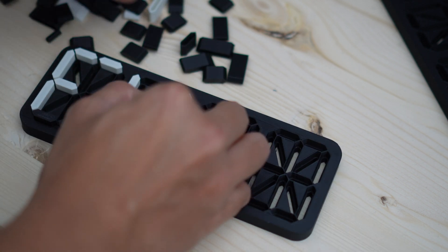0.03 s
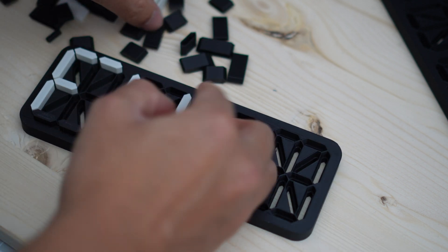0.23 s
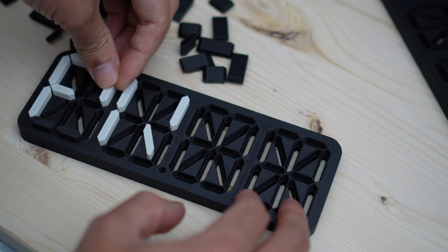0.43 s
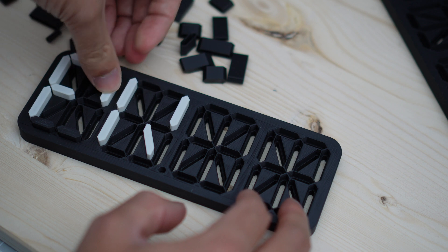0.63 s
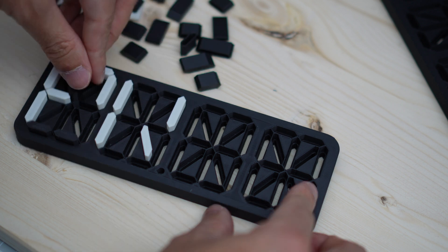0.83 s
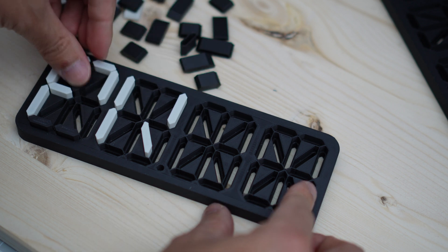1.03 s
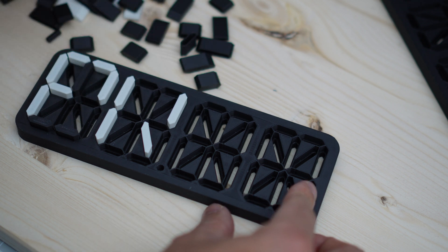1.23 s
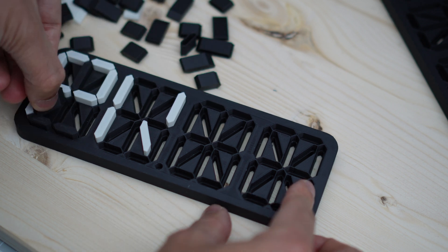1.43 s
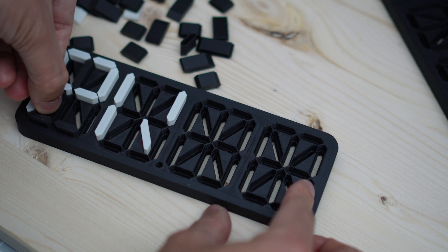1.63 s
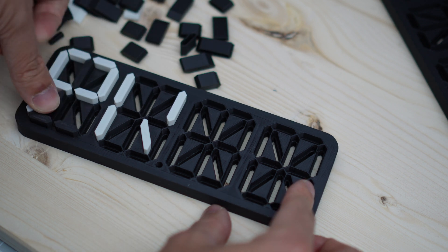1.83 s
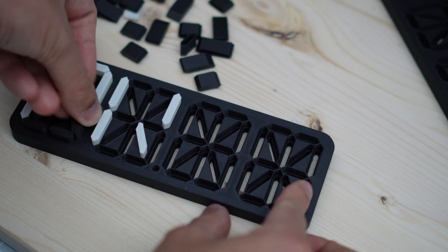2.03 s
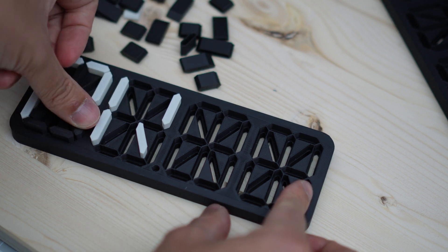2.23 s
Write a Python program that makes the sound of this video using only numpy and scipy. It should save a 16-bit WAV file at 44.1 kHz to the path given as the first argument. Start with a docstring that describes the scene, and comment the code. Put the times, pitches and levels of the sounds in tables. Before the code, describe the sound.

Small plastic pieces click sharply into a plastic panel on a wooden table; a loud snap opens, more follow around half a second, then a pause and lighter clicks. Close stereo microphone in a small quiet room.

```python
"""At a wooden table in a small room, fingers press small plastic pieces into a plastic panel, close by.
Pieces snap home, creak and scrape: noise bursts, sharp slips and rough noise ring plastic resonances.
Thuds shake the modes of the table top, decaying noise answers as the room, and faint air noise and
hiss lie beneath. At two instants all ringing already under way drops at once.
"""
import sys
import numpy as np
from scipy import signal
from scipy.fft import rfft, irfft, next_fast_len
from scipy.io import wavfile
from scipy.ndimage import uniform_filter1d

SR = 44100
rng = np.random.default_rng(int(sys.argv[2]) if len(sys.argv) > 2 else 0)


def store_pcm(level_fs):
    """Save levels as 16-bit WAV."""
    pcm = np.round(np.clip(level_fs, -1, 1) * 32767).astype(np.int16)
    wavfile.write(sys.argv[1], SR, np.atleast_2d(pcm).T)


def invert_db(x):
    """Field ratio 10**(x/20) for x, a level in decibels (scalar or array-like)."""
    u = np.asarray(x, float) / 20
    return 10 ** u


N = 100856
LEAD = 2205  # samples laid down before time zero, for sounds that begin early
CLICK_S = 0.0091  # time in which a click, or the shiver of a creak, falls 20 dB

RISE_SHARE, CRACKLE_DB = 0.15, -0.5  # rise as a share of CLICK_S; scatter of the crackle
CLICK_ROOM_DB = -6
# Pieces snapping home: start_s [s, middle of the rise], level_db [dB, strongest 3 ms, before a
# common 9 dB cut], pitch_hz [Hz, resonance of the piece], treble_db [dB, at 11 kHz and above]
CLICKS = [(-.012, 0.5, 2970, 5.5), (.2645, -27, 5600, 3), (0.2099, -46.5, 3100, -7),
          (0.2713, -17, 6080, -2), (0.3272, -26.5, 6000, -2.5), (.4498, -23, 5600, 8.5),
          (0.4554, -19, 4670, -9), (.536, -14.5, 4630, 16), (.5388, -5.5, 4930, 15),
          (0.7143, -31.5, 4560, -12.5), (.9229, -18.5, 5700, 0.5), (.9252, -13.5, 4170, 4.5),
          (.933, -16.5, 5450, -9.5), (1.373, -17, 6300, 5), (1.3826, -19, 6100, -2),
          (1.4005, -17.5, 6330, 1), (1.4501, -39.5, 3180, -35), (1.4905, -33, 3460, 1),
          (1.509, -33.5, 3600, -5), (1.5489, -32, 4200, 1), (1.6636, -39, 5680, -11.5),
          (1.6985, -32.5, 4060, 0), (1.7284, -26.5, 5260, 4), (1.737, -16.5, 5250, 5),
          (1.9364, -35, 3450, 3), (1.942, -20.5, 4350, 4), (1.9619, -20.5, 4600, -4),
          (2.0986, -10, 4700, 12.5), (2.1994, -10, 4710, 5), (2.2214, -22.5, 4800, 14)]


def clicks(out):
    """Impact excitation: a crackling noise burst swells, dies exponentially and rings the plastic."""
    t = np.arange(SR // 20) / SR
    rise = RISE_SHARE * CLICK_S
    shape = np.where(t < rise, t / rise, invert_db(-20 * (t - rise) / CLICK_S))
    for start_s, level_db, pitch_hz, treble_db in CLICKS:
        # the crackle holds each random level for 20 samples
        held = np.repeat(rng.standard_normal(len(t) // 20 + 1), 20)[:len(t)]
        push = shape * invert_db(CRACKLE_DB * held) * rng.standard_normal((2, len(t)))
        pair = plastic(push, start_s, pitch_hz, treble_db)
        strongest = np.sqrt(np.max(uniform_filter1d(pair[0] ** 2, size=130)))
        pair = invert_db(level_db - 9.0) * pair / strongest
        add(out, heard(pair, CLICK_ROOM_DB), start_s - rise / 2)


CREAK_HZ, CREAK_TREBLE_DB, CREAK_ROOM_DB = 4200, -17.5, -9
CREAK_PANEL_DB, CHATTER_DB = 16, -16  # panel modes over the plain body; shiver after the slip
# Ticks of one creak: start_s [s], level_db [dB, peak of the direct mid sound]
TICKS = [(0.3968, -27), (0.4079, -24.5), (0.4218, -24.5), (.432, -25), (0.4428, -18.5)]


def creak(out):
    """Stick-slip: each sharp slip is an impulse with a short shiver, ringing the same panel modes."""
    lead_in = 20  # samples ahead of the slip, as the plastic's tilt spreads it both ways in time
    shiver = invert_db(CHATTER_DB - 20 * np.arange(SR // 20) / SR / CLICK_S)
    for start_s, level_db in TICKS:
        push = shiver * rng.standard_normal((2, len(shiver)))
        push[0, 0] = 1
        push = np.roll(push, lead_in, axis=1)
        pair = plastic(push, start_s, CREAK_HZ, CREAK_TREBLE_DB, CREAK_PANEL_DB, scatter_db=2)
        pair = invert_db(level_db) * pair / np.abs(pair[0]).max()
        add(out, heard(pair, CREAK_ROOM_DB), start_s - lead_in / SR)


SLIPS_PER_S, SLIP_DB = 2100, 3  # rate of the random slip levels, and their scatter
SCRAPE_ROOM_DB = -9
# Scrapes of a piece along its slot: start_s [s], length_s [s, cut off at 0.125 s], level_db [dB, rms
# taken over length_s], pitch_hz [Hz, resonance of the piece], treble_db [dB, at 11 kHz and above]
SCRAPES = [(1.333, 0.048, -43, 5160, 4.5), (1.357, 0.075, -34.5, 4500, -3), (1.547, 0.055, -46.5, 4720, -8),
           (1.959, 0.068, -36.5, 3790, 2), (2.113, 0.031, -36, 3330, 3), (2.213, 0.02, -29, 4870, -30),
           (0.529, 0.017, -23.5, 5040, 7.5), (0.696, 0.049, -50, 3240, -9), (1.404, 0.33, -58.5, 3240, -36)]


def scrapes(out):
    """Friction noise: uneven slips, one upon another, drive the plastic as roughly modulated noise."""
    t = np.arange(SR // 8) / SR
    for start_s, length_s, level_db, pitch_hz, treble_db in SCRAPES:
        slip_levels = np.interp(t * SLIPS_PER_S, np.arange(400), rng.standard_normal(400))
        rise = t / 0.0011
        fall = (length_s - t) / (0.54 * length_s)
        shape = np.clip(np.minimum(rise, fall), 0, 1)
        push = shape * invert_db(SLIP_DB * slip_levels) * rng.standard_normal((2, len(t)))
        pair = plastic(push, start_s, pitch_hz, treble_db)
        rms = np.linalg.norm(pair[0]) / np.sqrt(length_s * SR)
        add(out, heard(invert_db(level_db) * pair / rms, SCRAPE_ROOM_DB), start_s)


PANEL_DB, PANEL_SCATTER_DB, PANEL_Q = 7, 3, 22  # modes over the plain body, and their scatter
PIECE_DB, PIECE_Q = 18.5, 12  # the piece's resonance over the plain body
# Modes of the panel: pitch_hz [Hz]
PANEL_HZ = [2650, 3300, 4200, 4900, 5600, 7600, 9500, 11900]
# Broad tilt of the plastic: pitch_hz [Hz], level_db [dB per Hz]
PLASTIC = [(290, -48.5), (500, -36), (1490, -8), (4590, -4.5), (7660, -6.5), (11900, -15), (15600, -25),
           (16400, -44)]
# Level of the plastic's lower body sound, panel and piece together, full up to 2800 Hz and
# fading out by 4300 Hz: start_s [s], level_db [dB]
BODY = [(0, -7), (.3, 1.5), (.55, 1), (.92, -3.5), (1.3, -15.5), (1.41, -6.5), (1.46, 3), (1.75, 3),
        (2.25, 3.5)]


def plastic(push, start_s, pitch_hz, treble_db, panel_db=PANEL_DB, scatter_db=PANEL_SCATTER_DB):
    """Modal resonance: a push rings the panel's modes and the piece's own resonance, in parallel."""
    mode_db = rng.normal(panel_db, scatter_db, len(PANEL_HZ))
    body_db = np.interp(start_s, *np.transpose(BODY))
    balance = [(2800, body_db), (4300, 0), (6000, 0.0061), (11000, treble_db)]  # (Hz, dB)

    def response(f):
        panel = 1 + sum(invert_db(d) * peak(f, c, c / PANEL_Q) for c, d in zip(PANEL_HZ, mode_db))
        piece = invert_db(PIECE_DB) * peak(f, pitch_hz, pitch_hz / PIECE_Q)
        return invert_db(along(PLASTIC, f) + along(balance, f)) * (panel + piece)

    return filtered(push, response)


THUD_ATTACK_S, FIRST_T60_S, SECOND_T60_S = .004, 0.28, 0.24
KNOCK, WOOD_SCATTER_DB = .6, 3  # first blow over the norm of the shaking; scatter of the modes
# First group of table-top modes: pitch_hz [Hz], width_hz [Hz, of each of two equal resonances in
# series], level_db [dB, relative within the group]
WOOD_FIRST = [(132.1, 29.2, 2), (187, 50, -12)]
# Second group of table-top modes, one deep boom and three higher ones; its level is set separately
# for each thud. The same columns: pitch_hz [Hz], width_hz [Hz], level_db [dB]
WOOD_SECOND = [(80, 22, -6), (280.8, 85, -8.5), (339.3, 160, -3.5), (838, 110, -4.5)]
# Thuds into the table: start_s [s], level_db [dB, peak of the first group],
# second_db [dB, peak of the second group over that]
THUDS = [(-0.0026, -42.5, 0.5), (0.099, -57, -10), (.335, -54, -6.5), (0.399, -60.5, 1.5), (.44, -56, 8),
         (.533, -46, -3), (1.357, -60.5, 2.5), (1.493, -54, -10), (1.574, -53, -6.5), (1.639, -57, -23),
         (1.731, -49.5, -9.5), (1.941, -51.5, 3.5), (1.984, -57, 7.5), (2.097, -56, 9.5),
         (2.199, -65.5, 17)]


def table(out):
    """Plate modes: a push of hand or panel shakes the table top, whose modes answer unevenly."""
    t = np.arange(SR // 2) / SR
    for start_s, level_db, second_db in THUDS:
        first = WOOD_FIRST, level_db, FIRST_T60_S
        second = WOOD_SECOND, level_db + second_db, SECOND_T60_S
        ring = 0
        for modes, peak_db, t60_s in (first, second):
            envelope = (1 - np.exp(-t / THUD_ATTACK_S)) * invert_db(-60 * t / t60_s)
            shake = envelope * rng.standard_normal(len(t))
            shake[0] = KNOCK * np.linalg.norm(shake)
            chance_db = rng.normal(0, WOOD_SCATTER_DB, len(modes))

            def response(f):
                return sum(invert_db(db + chance) * peak(f, hz, width) ** 2
                           for (hz, width, db), chance in zip(modes, chance_db))

            part = filtered(shake, response)
            ring = ring + invert_db(peak_db) * part / np.abs(part).max()
        add(out, np.array([ring, ring]), start_s)


ROOM_GAP_S, ROOM_BUILD_S = 0.0015, 0.001  # silence before the tail, and its fade-in
LATE_DB, LATE_LONGER = -13.5, 2.02  # slow decay: level under the quick one, times its t60
DRY_SIDE_DB = -10
# Quick decay of the room: pitch_hz [Hz], t60_s [s]
ROOM = [(700, 0.26), (1800, 0.24), (4800, 0.17), (14000, 0.14)]
# Side over mid in the tail (half of these dB in the direct sound): pitch_hz [Hz], level_db [dB]
ROOM_SIDE = [(300, -5.5), (2000, -19), (4000, -7), (12000, 0)]


def heard(pair, room_db):
    """Reverberation: direct sound plus a fresh diffuse tail, a quick decay over a slow one."""
    hz, t, grains = signal.stft(rng.standard_normal((4, SR // 3)), SR, nperseg=256)
    fall_db = -60 * t / along(ROOM, hz)[:, None]
    decay = invert_db(fall_db) + invert_db(LATE_DB + fall_db / LATE_LONGER)
    tail = signal.istft(grains * decay, SR, nperseg=256)[1]
    tail_t = np.arange(tail.shape[1]) / SR
    tail = tail * np.clip((tail_t - ROOM_GAP_S) / ROOM_BUILD_S, 0, 1)
    tail = tail / np.linalg.norm(tail[0])
    # rows: mid and side answer to the mid push, then to the side push
    tail = filtered(tail, lambda f: np.array(2 * [1 + 0 * f, invert_db(along(ROOM_SIDE, f))]))
    from_mid = signal.fftconvolve(pair[0][None], tail[:2], axes=1)
    from_side = signal.fftconvolve(pair[1][None], tail[2:], axes=1)
    wet = invert_db(room_db) * (from_mid + from_side) / np.sqrt(2)
    direct_side = filtered(pair[1], lambda f: invert_db(DRY_SIDE_DB + along(ROOM_SIDE, f) / 2))
    direct = np.array([pair[0], direct_side])
    mid, side = wet + np.pad(direct, ((0, 0), (0, wet.shape[1] - pair.shape[1])))
    return np.array([mid + side, mid - side])


AIR_DB = -73  # rms of the mid signal
# Spectrum of the air noise: pitch_hz [Hz], level_db [dB per Hz, relative]
AIR = [(20, -33), (70, -2), (300, -7.5), (1200, -13), (5000, -15), (16500, -31.5)]
# Side over mid in the air noise: pitch_hz [Hz], level_db [dB]
AIR_SIDE = [(60, -9), (15000, 0.5)]


def air():
    """Stationary noise: the quiet room and the microphone's hiss, as shaped Gaussian noise."""
    def response(f):
        return invert_db(along(AIR, f) + np.array([0 * f, along(AIR_SIDE, f)]))

    mid, side = filtered(rng.standard_normal((2, N)), response)
    return invert_db(AIR_DB) * np.array([mid + side, mid - side]) / mid.std()


DROP_S = .0015  # time a drop takes
# Sudden drops of all ringing under way: start_s [s], level_db [dB, change]
DROPS = [(0.336, -3), (1.4033, -20)]


def add(out, sound, start_s):
    """Superposition: lays a stereo sound in at start_s; its level falls at each later drop."""
    first = max(round(start_s * SR) + LEAD, 0)
    sound = sound[:, :out.shape[1] - first]
    t = start_s + np.arange(sound.shape[1]) / SR
    change_db = 0
    for drop_s, drop_db in DROPS:
        change_db = change_db + drop_db * np.clip((t - drop_s) / DROP_S, 0, 1) * (start_s < drop_s)
    out[:, first:first + len(t)] += sound * invert_db(change_db)


def along(points, hz):
    """Logarithmic frequency scale: interpolates (Hz, value) points along it."""
    f, v = np.transpose(points)
    return np.interp(np.log(hz + 1), np.log(f + 1), v)


def filtered(x, response):
    """Linear filtering: multiplies the spectrum of x by a complex response of frequency."""
    n = x.shape[-1]
    m = next_fast_len(n + 2048)
    return irfft(rfft(x, m) * response(np.fft.rfftfreq(m, 1 / SR)), m)[..., :n]


def peak(f, hz, width):
    """Damped oscillator: the response of one causal resonance, of unit height."""
    return 1j * f * width / (hz * hz - f * f + 1j * f * width + 1e-9)


def scene():
    """Superposition of sources: pieces and table, leaning slightly left, over the air."""
    out = np.zeros((2, N + LEAD))
    for add_source in clicks, creak, scrapes, table:
        add_source(out)
    pan_db = 0.16
    return out[:, LEAD:] * invert_db([[pan_db], [-pan_db]]) + air()


def low_pass(x):
    """Removes everything above the highest recorded frequency."""
    return signal.sosfilt(signal.butter(12, 16500, fs=SR, output="sos"), x)


def record(dry):
    """Signal chain: the finished stereo mix passes through one last stage."""
    return low_pass(dry)


dry = scene()
out = record(dry)
store_pcm(out)
```